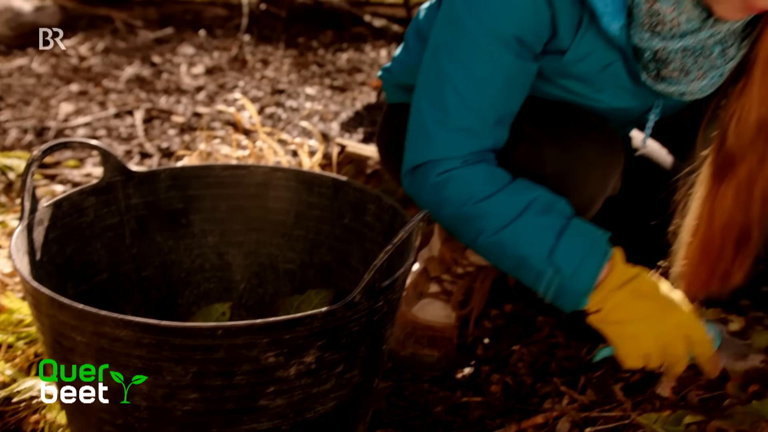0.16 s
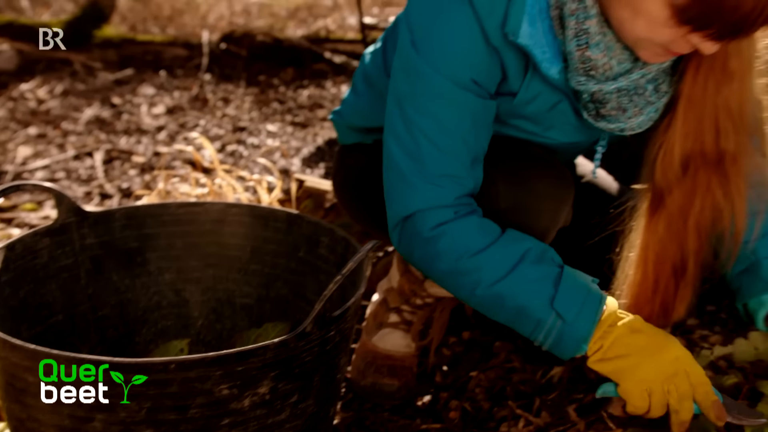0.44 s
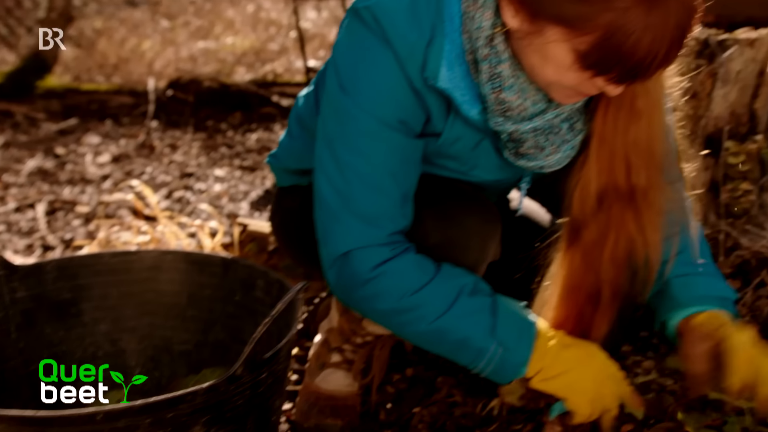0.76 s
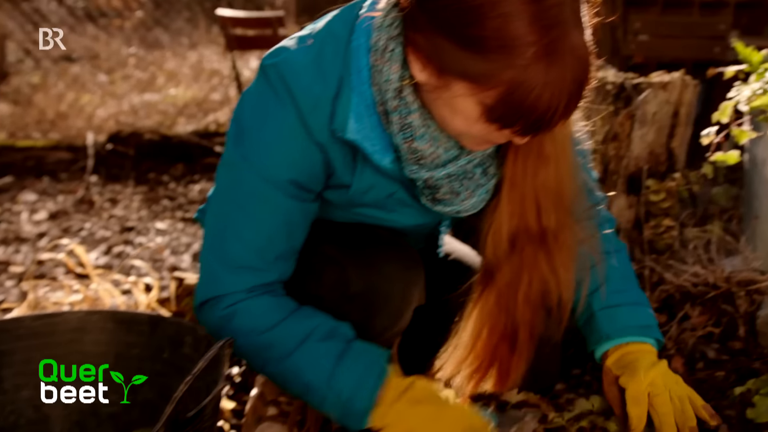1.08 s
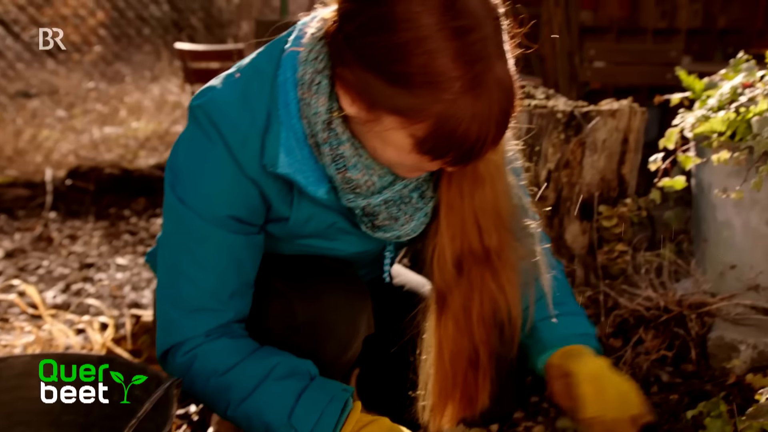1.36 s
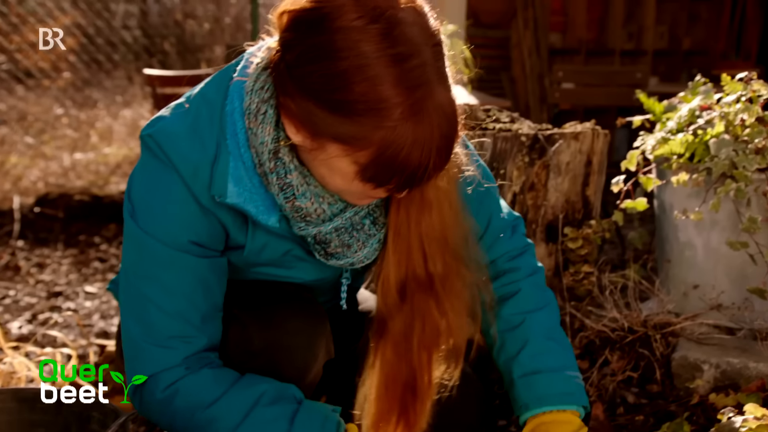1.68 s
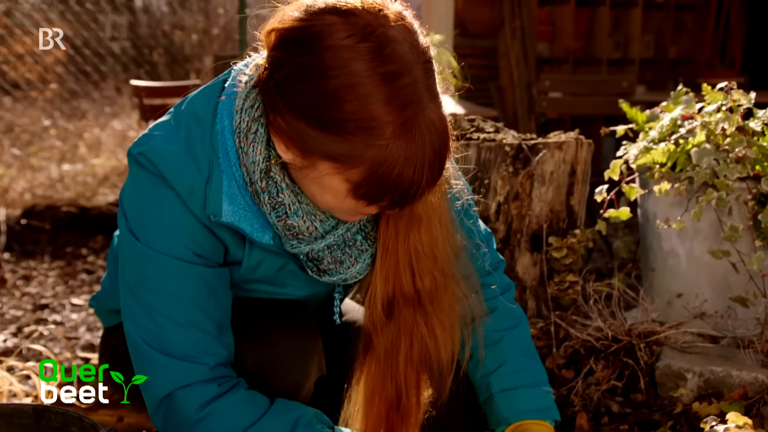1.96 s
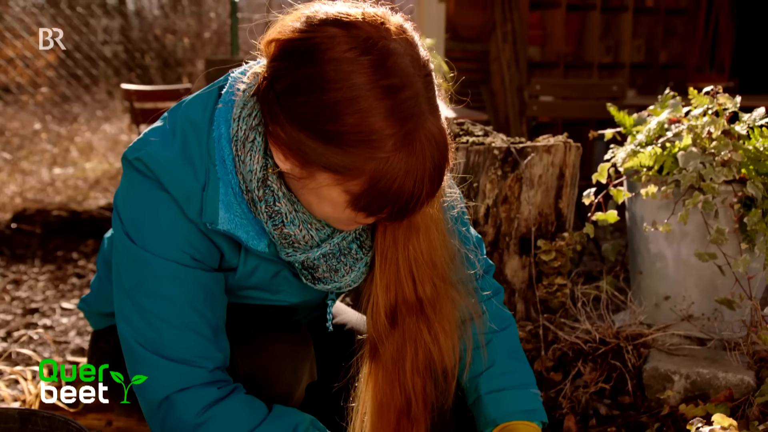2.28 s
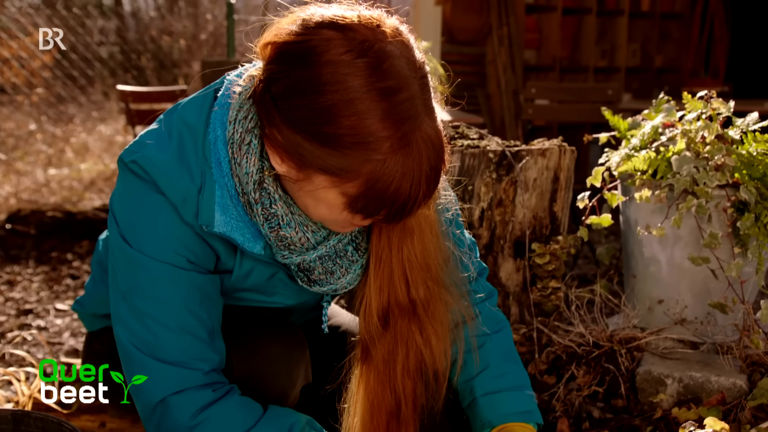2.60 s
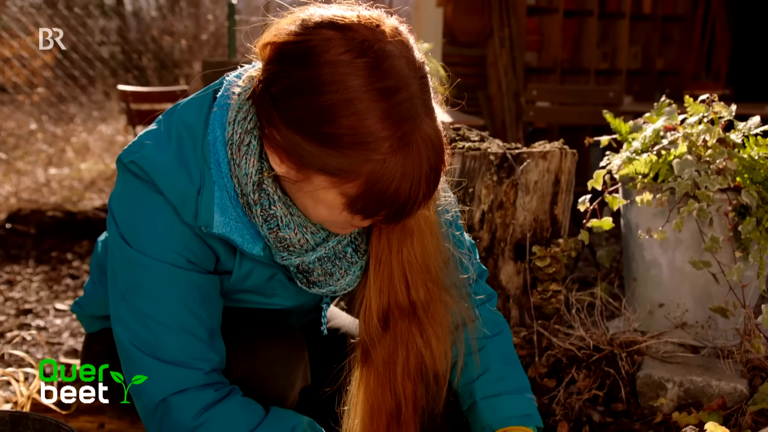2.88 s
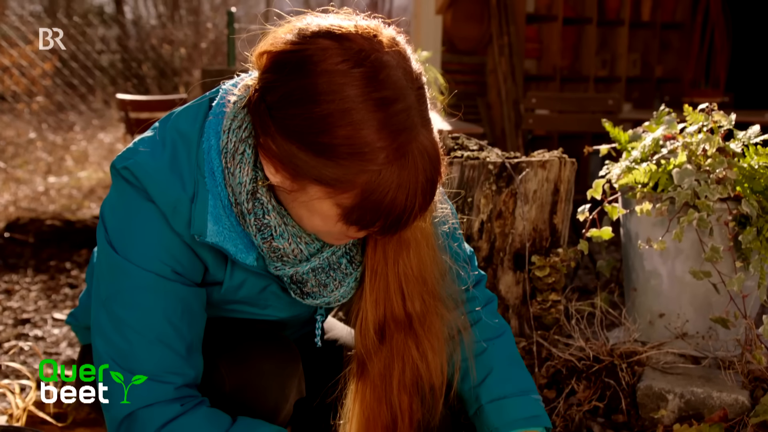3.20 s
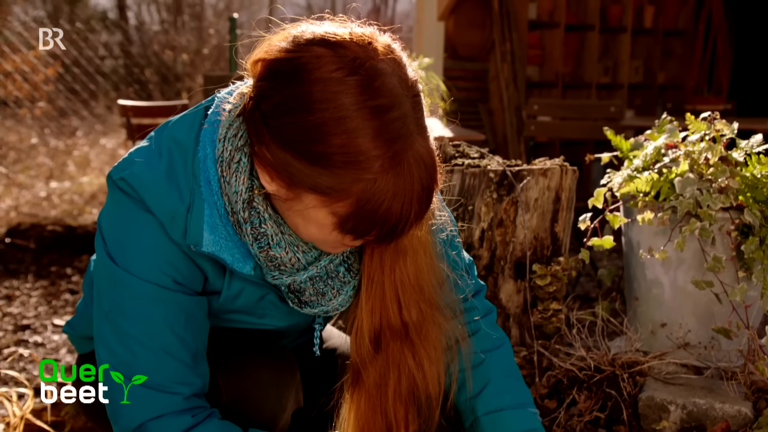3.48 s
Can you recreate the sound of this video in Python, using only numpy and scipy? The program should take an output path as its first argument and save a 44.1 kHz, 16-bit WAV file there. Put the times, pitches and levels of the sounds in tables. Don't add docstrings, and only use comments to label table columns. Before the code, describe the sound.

Dry leathery leaves rustle and crackle in uneven handfuls, with light stem snaps; just after three seconds garden shears close with one sharp click, then faint rustle. Quiet outdoor garden, close microphone, low distant traffic rumble.

```python
import sys
import numpy as np
from scipy import signal
from scipy.fft import rfft, irfft
from scipy.io import wavfile
from scipy.ndimage import uniform_filter1d

SR = 44100
rng = np.random.default_rng(int(sys.argv[2]) if len(sys.argv) > 2 else 0)


def wav_out(sig):
    wavfile.write(sys.argv[1], SR, np.round(np.clip(np.atleast_2d(sig).T, -1, 1) * 32767).astype(np.int16))


def ratio(d):
    e = np.asarray(d, float) / 20
    return 10 ** e


N = 160965


def read(points, hz):
    f, value = np.transpose(points)
    return np.interp(np.log(hz + 1), np.log(f + 1), value)


def evened(x):
    return x / np.sqrt(np.mean(x ** 2) + 1e-20)


def add(mix, s, sound):
    part = mix[round(s * SR):][:len(sound)]
    part += sound[:len(part)]


def ring(x, hz, width_hz):
    r = np.exp(-np.pi * width_hz / SR)
    return signal.lfilter([1, 0, -r], [1, -2 * r * np.cos(2 * np.pi * hz / SR), r * r], x)


def sparse(rate, spread_db):
    size = ratio(spread_db * np.minimum(rng.exponential(1, N), 4))
    return evened(size * (rng.random(N) < rate / SR))


def clumps():
    rate, length_s, spread_db, floor = 110, 0.0071, 3.5, 10.5
    swell = np.sin(np.pi * np.arange(0, 1, 1 / (length_s * SR)) ** 0.82) ** 2
    return evened(signal.oaconvolve(sparse(rate, spread_db), swell)[:N] + floor)


def leaf_power(hz):
    # t/s, level/dB, brightness/(dB per octave)
    hands = [(0, -62.5, -9.5), (.07, -57.5, -2.5), (.15, -45, -1), (.45, -47.5, -1), (.48, -55.5, -3),
             (.56, -48.5, -1.5), (.92, -53, -1), (1.0, -46, -2), (1.41, -55, 0.5), (1.425, -80, 2),
             (1.575, -67.5, -3), (1.6, -48, -2), (1.96, -55, -0.5), (2.12, -81, -5), (2.74, -66, 4),
             (2.78, -89, -11), (3.06, -49.5, -2), (3.65, -59, -1)]
    # start t/s, length/s, level/dB, f/Hz
    grabs = [(0, 0.039, -60, 750), (.155, 0.083, -43.5, 3770), (.26, .015, -48.5, 5500),
             (0.301, 0.061, -47, 3500), (0.361, 0.062, -45.5, 4000), (0.429, 0.044, -51, 4550),
             (0.552, 0.054, -51.5, 4030), (0.66, 0.037, -46.5, 4500), (0.75, .055, -49, 2480),
             (0.867, 0.029, -49.5, 2020), (.955, 0.052, -41.5, 2510), (0.972, 0.011, -44.5, 2520),
             (1.094, 0.072, -46.5, 4100), (1.146, 0.034, -40, 6400), (1.191, 0.016, -41, 1000),
             (1.283, 0.02, -52, 1490), (1.389, 0.016, -49, 1000), (1.591, 0.048, -45.5, 1490),
             (1.743, 0.057, -52, 4000), (1.795, 0.022, -46, 4050), (1.978, 0.011, -47.5, 8050),
             (2.188, 0.014, -51, 5000), (2.239, 0.011, -51.5, 6000), (2.311, .016, -51.5, 5040),
             (2.431, 0.017, -47.5, 6000), (2.639, 0.021, -56, 5500), (2.955, 0.038, -49.5, 5800),
             (3.208, 0.02, -45.5, 2920), (3.349, 0.028, -44.5, 7040), (3.379, 0.077, -49.5, 5040)]
    rise, tune_db, tune_octaves = 0.16, 4.5, 0.77
    t = np.arange(N) / SR
    s, db, tilt = np.transpose(hands)
    octave = np.log2(hz / 3000)
    power = ratio(2 * (np.interp(t, s, db) + octave * np.interp(t, s, tilt)))
    for start, length, grab_db, grab_hz in grabs:
        u = np.arange(0, 1, 1 / (length * SR))
        shape = np.minimum(np.minimum(u, 1 - u) / rise, 1)
        nearness = np.exp(-(np.log2(hz / grab_hz) / tune_octaves) ** 2)
        add(power, start, shape * ratio(2 * (grab_db + tune_db * (nearness - 0.5))))
    return power


def rustle():
    # f/Hz, level/(dB per Hz)
    leaf = [(120, -36), (200, -10.5), (342, -1.5), (498, -8.5), (629, -0.5), (1840, -3), (6320, -4.5),
            (11200, -10.5), (14400, -11.5)]
    cracks_per_s, crack_spread_db, hiss = 1500, 2.5, 0.6
    shared = 0.46
    out = np.zeros(N)
    all_leaves = clumps()
    for hz in np.geomspace(260, 13000, num=12):
        cracks = sparse(cracks_per_s, crack_spread_db) * rng.choice([-1., 1.], N)
        friction = cracks + hiss * rng.standard_normal(N)
        drive = friction * (shared * all_leaves + (1 - shared) * clumps())
        patch = evened(ring(ring(drive, hz, 0.5 * hz), hz, 0.5 * hz))
        out += patch * np.sqrt(leaf_power(hz) * hz / 40000) * ratio(read(leaf, hz) + 4)
    return out


def snap(peak_db, hz, scrape_db):
    rise_s, crack_t60, scrape_t60 = 0.00095, 0.0069, 0.045
    q, wide_db = 3.3, -5
    t = np.arange(4000) / SR
    burst, grit = rng.standard_normal((2, len(t)))
    tone = evened(ring(burst, hz, hz / q)) + ratio(wide_db) * evened(np.diff(burst, prepend=0))
    crack = tone * np.minimum(t / rise_s, 1) ** 2 * ratio(-60 * t / crack_t60)
    scrape = evened(ring(grit, 4200, 6100)) * ratio(-60 * t / scrape_t60)
    return ratio(peak_db) * (crack / abs(crack).max() + ratio(scrape_db) * scrape)


def snaps():
    # t/s, peak level/dB, f/Hz, level of the scrape after it/dB
    breaks = [(0.247, -30.5, 4800, -15), (0.2611, -26.5, 5700, -17), (0.4447, -40.5, 4880, -16),
              (0.5273, -38, 5030, -14), (0.551, -31.5, 4100, -20), (0.617, -38, 6790, -19),
              (0.6514, -36.5, 4500, -6), (0.6908, -33.5, 4400, -25), (0.76, -39.5, 4170, -19),
              (0.843, -40, 2080, -11), (0.9846, -26, 2450, -9.5), (1.0977, -30.5, 6700, -12),
              (1.1652, -30.5, 2040, -18), (1.3637, -43.5, 5040, -4), (1.9078, -36.5, 2620, -21.5),
              (1.981, -38.5, 8800, -20.5), (2.0812, -46.5, 2620, -13), (2.1878, -28.5, 6750, -18),
              (2.2803, -37.5, 2600, -15), (2.3777, -47.5, 5200, -17), (2.4928, -35.5, 9250, -15.5),
              (2.6378, -28, 5200, -16), (2.8387, -43, 2700, -16), (2.8679, -43.5, 4420, -22),
              (2.8747, -48, 5190, -24), (2.8908, -34.5, 5100, -13.5), (2.9673, -37.5, 5770, -16),
              (2.9766, -36, 5470, -23), (3.1078, -47, 7880, -22), (3.5877, -43, 6190, -18)]
    out = np.zeros(N)
    for s, peak_db, hz, scrape_db in breaks:
        add(out, s, snap(peak_db, hz, scrape_db))
    return out


def shears():
    # t/s, peak level/dB, treble tilt/(dB per octave)
    cut = [
        (3.0377, -26, 4),
        (3.0375, -24, 12),
        (3.0426, -20.5, -4),
        (3.0436, -7, 8),
        (3.0450, -19, -5),
    ]
    # f/Hz, level/dB, t60/s
    modes = [(750, -14, 0.014), (1915, 0.5, 0.0076), (3850, -26, 0.0087), (5240, 3.5, 0.0041),
             (6230, 5, 0.0028), (8570, -30, .008), (10700, -28, 0.0069), (14300, -10.5, 0.002)]
    noise_db, noise_t60 = -5, 0.026
    t, out = np.arange(3000) / SR, np.zeros(N)
    for s, peak_db, treble_db in cut:
        hit = ratio(noise_db - 60 * t / noise_t60) * rng.standard_normal(len(t))
        for hz, db, t60 in modes:
            tilt_db = treble_db * np.log2(hz / 4000)
            hit += ratio(db + tilt_db - 60 * t / t60) * np.sin(2 * np.pi * hz * t)
        add(out, s, -ratio(peak_db) * hit / abs(hit).max())
    return out


def air():
    # f/Hz, level/(dB per Hz)
    hush_colour = [(12, -23), (20, 0.5), (71, 1), (281, -19.5), (1210, -23), (2470, -31.5), (5200, -32),
                   (12500, -42), (14400, -40)]
    hush_db, drone_db, sway_db = -54, -62, -56
    hz = np.fft.rfftfreq(N, 1 / SR)
    hush = irfft(rfft(rng.standard_normal(N)) * ratio(read(hush_colour, hz)) * (hz > 18), N)
    drone = ring(rng.standard_normal(N), 54.6, 11)
    sway = ring(ring(rng.standard_normal(N), 17, 3.7), 17, 3.7)
    return ratio(hush_db) * evened(hush) + ratio(drone_db) * evened(drone) + ratio(sway_db) * evened(sway)


def scene():
    mix = rustle() + snaps() + shears() + air()
    return np.array([mix, mix])


def side_hiss(mid):
    # f/Hz, level under the centre/dB
    spread = [(3800, -56), (4300, -13), (6000, -5), (9000, -1.5), (14000, -1.5)]
    # f/Hz, chance (0 to 1)
    spread_odds = [(4000, .05), (5500, .35), (7000, .7), (9000, .85), (12000, .75), (14000, .6)]
    hz, t, z = signal.stft(mid, SR, nperseg=512, noverlap=384)
    level = np.sqrt(uniform_filter1d(abs(z) ** 2, size=9, axis=0))
    block, band = np.arange(len(t)) // 8, np.arange(len(hz)) // 10
    blocks = block.max() + 1
    luck = uniform_filter1d(rng.standard_normal((band.max() + 1, blocks)), size=3, axis=1)
    luck = uniform_filter1d(luck, size=2, axis=0)
    luck = luck.ravel().argsort().argsort().reshape(luck.shape) / luck.size
    treble = level[hz > 2000].sum(axis=0)
    treble = np.pad(treble, (0, 8))[:blocks * 8].reshape(-1, 8)
    steady = treble.max(axis=1) < 2.4 * np.median(treble, axis=1)
    on = (luck[band][:, block] < read(spread_odds, hz)[:, None]) * steady[block]
    a, b = rng.standard_normal((2, len(hz), len(t)))
    hiss = level * on * ratio(read(spread, hz) + 2)[:, None] * (a + 1j * b)
    return signal.istft(hiss, SR, nperseg=512, noverlap=384)[1][:N]


def roll_off(x):
    return signal.sosfilt(signal.butter(12, 15620, fs=SR, output="sos"), x)


def record(dry):
    mid = signal.oaconvolve(dry[0], signal.firwin(301, 14250, fs=SR), "same")
    side = side_hiss(mid)
    return roll_off(np.array([mid + side, mid - side]))


dry = scene()
out = record(dry)
wav_out(out)
```